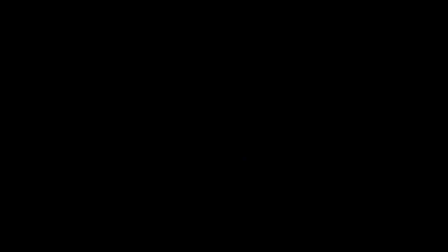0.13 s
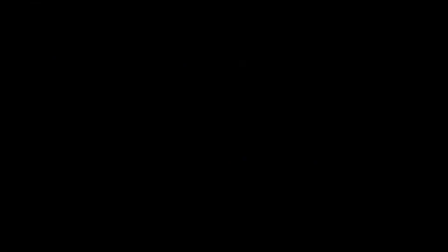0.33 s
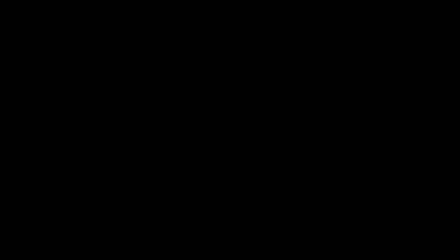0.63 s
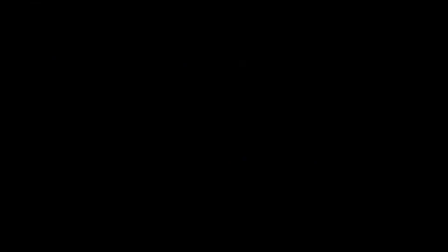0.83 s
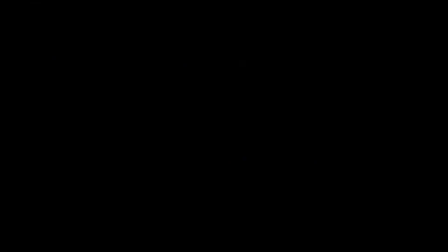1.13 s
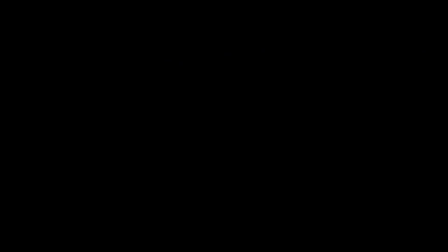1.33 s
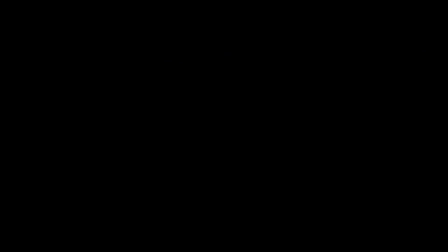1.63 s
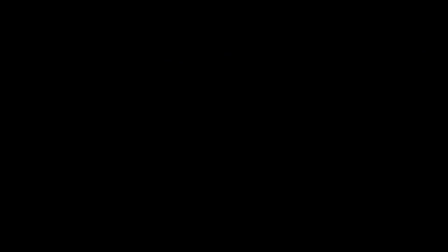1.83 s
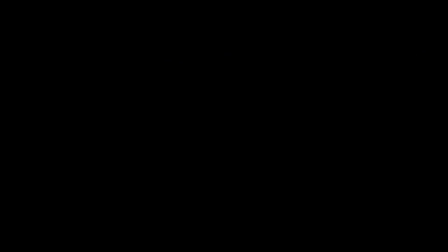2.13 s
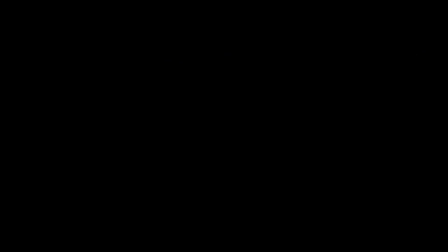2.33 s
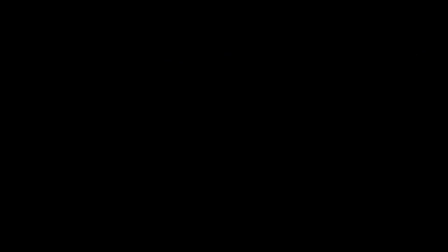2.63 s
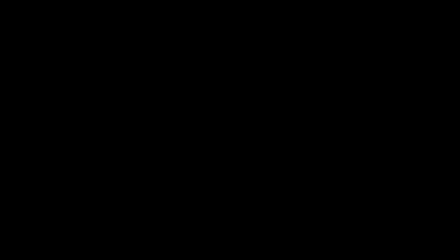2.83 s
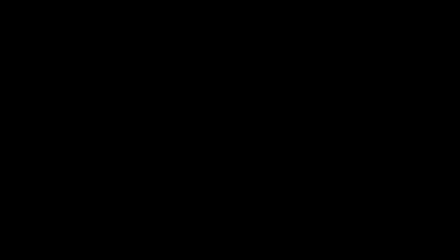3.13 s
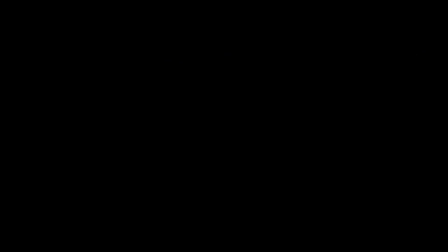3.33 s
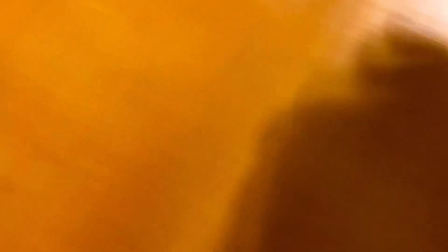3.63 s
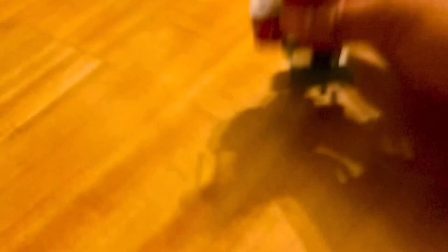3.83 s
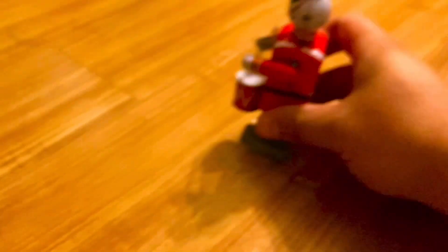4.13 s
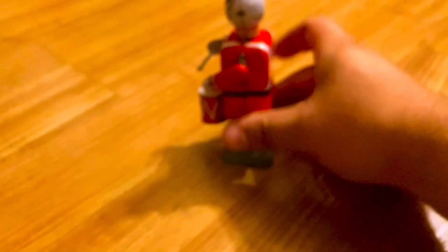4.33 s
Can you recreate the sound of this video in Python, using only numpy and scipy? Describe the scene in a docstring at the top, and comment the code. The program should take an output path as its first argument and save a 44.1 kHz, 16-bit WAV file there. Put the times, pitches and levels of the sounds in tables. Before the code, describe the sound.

Very close to a covered stereo microphone indoors, a tin clockwork toy is wound in short, uneven, muffled rasps with dry pawl clicks over faint mains hum. After about three seconds the camera is lifted with a deep double thump and knocks; then the gears whirr as a loud, bright, fluctuating hiss, with a small knock as the toy is set on a wooden floor.

```python
"""A tin clockwork toy is wound in short rasping strokes beside a camera whose microphones are covered.
The camera is lifted with a double thump; with the ports free the gears whirr as a loud bright hiss.
Rasp and whirr are dense random tooth contacts coloured by the tin; clicks are short noise plus tin tones;
thumps are brief low sines. A faint low tone swells once; mains hum, rumble and room tone lie underneath."""
import sys
import numpy as np
from scipy import signal
from scipy.fft import rfft, irfft, next_fast_len
from scipy.io import wavfile

SR = 44100
rng = np.random.default_rng(int(sys.argv[2]) if len(sys.argv) > 2 else 0)


def ratio(d):
    """dB to gain"""
    e = np.asarray(d, float) / 20
    return 10 ** e


def dump(signal):
    """Clip the signal to [-1, 1] and save it as 16-bit WAV at the path in sys.argv[1]."""
    limited = np.clip(np.atleast_2d(signal).T, -1, 1)
    pcm = np.round(limited * 32767).astype(np.int16)
    wavfile.write(sys.argv[1], SR, pcm)


N = 197347
SIZE = next_fast_len(N)
HZ = np.fft.rfftfreq(SIZE, 1 / SR)
TIME = np.arange(N) / SR


def in_time(rows):
    """Reads the columns of a curve table, sample by sample."""
    s, *columns = np.transpose(rows)
    return [np.interp(TIME, s, column) for column in columns]


def at_hz(points):
    """Reads a spectrum table at every frequency bin, on a log axis."""
    hz, value = np.transpose(points)
    return np.interp(np.log(HZ + 1), np.log(hz), value)


def rms_one(x):
    """Scales a sound to rms 1."""
    return x / np.sqrt(np.mean(x ** 2))


def drift(rate_hz):
    """Slow chance with spread 1, drawn at every 32nd sample."""
    r = np.exp(-64 * np.pi * rate_hz / SR)
    draws = rng.standard_normal(N // 32 + 1002)
    slow = signal.lfilter([1], [1, -2 * r, r * r], draws)[1000:]
    return np.interp(np.arange(N) / 32, np.arange(len(slow)), slow / np.std(slow))


def band(spectra, low_hz, high_hz):
    """Turns one band of a stereo spectrum back into sound."""
    skirt = 1 / np.sqrt((1 + (low_hz / (HZ + 1)) ** 16) * (1 + (HZ / high_hz) ** 16))
    return irfft(spectra * skirt, SIZE)[:, :N]


def ports(common, own, alike, lead):
    """Two microphone ports hear a shared wave, turned in phase, and a part of their own."""
    share = np.clip(at_hz(alike), 0, 1)
    hz, radians = np.transpose(lead)
    turn = np.exp(.5j * np.interp(HZ, hz, radians) * np.array([[1], [-1]]))
    return np.sqrt(share) * turn * rfft(common, SIZE) + np.sqrt(1 - share) * rfft(own, SIZE)


def swells(rows, idle_db=-120):
    """Level in dB of strokes that bite, swell to a peak, sag as slowly and die; powers add to an idle level."""
    swell_db_per_s, release_db_per_s = 86, 282
    onset_s, onset_from_db = 0.01, -24.5
    power = ratio(2 * idle_db)
    for s, length, peak_db, place in rows:
        end = s + length
        sag_db = -swell_db_per_s * np.abs(np.minimum(TIME, end) - s - place * length)
        bite_db = np.interp(TIME, [s - onset_s, s + onset_s], [onset_from_db, 0], left=-200)
        release_db = -release_db_per_s * np.maximum(TIME - end, 0)
        power = power + ratio(2 * (peak_db + sag_db + bite_db + release_db))
    return 10 * np.log10(power)


def clockwork(levels_db, bands, colour, hollows, alike, lead, per_s, spread_db, flutter_db, patchy_db, burst_db):
    """Dense tooth contacts of uneven size ring the tin; each frequency band follows its own level."""
    sizes = ratio(spread_db * np.minimum(rng.exponential(1, (3, N)), 5)) * rng.choice([-1, 1], (3, N))
    teeth = sizes * (rng.random((3, N)) < per_s / SR)
    body = 1 + sum(ratio(db) / (1 + (2 * (HZ - hz) / width) ** 2) for hz, width, db in hollows)
    # many close modes of the sheet make the colour ragged in steps of about 70 Hz
    ragged = ratio(2.6 * np.interp(HZ / 70, np.arange(400), rng.standard_normal(400)))
    spectra = ratio(at_hz(colour)) * body * ragged * ports(teeth[0], teeth[1:], alike, lead)
    # the train stumbles, and teeth come in bursts
    shared_db = flutter_db * np.tanh(drift(29)) + burst_db * np.tanh(drift(380))
    out = 0
    for level_db, low, high in zip(levels_db, bands, bands[1:]):
        edges = np.geomspace(low, high, 4)
        # the strips of a band drift by chance while their sum stays even
        parts = [band(spectra, *pair) for pair in zip(edges, edges[1:])]
        gains = [ratio(patchy_db * drift(13.2)) for part in parts]
        power = sum(gain ** 2 * np.mean(part ** 2) for gain, part in zip(gains, parts))
        strips = sum(gain * part for gain, part in zip(gains, parts)) / np.sqrt(power)
        out = out + ratio(level_db + shared_db) * rms_one(strips)
    return out


# Turns of the key. Each row: start in seconds, length in seconds, level of the teeth in dB,
# place of the peak along the stroke (0-1), tin body in dB against the teeth.
KEY_TURNS = [(-0.03, 0.12, -46, 0.53, -1), (0.11, 0.025, -48, 0.3, -2), (0.182, 0.012, -50.5, 0.3, -4.5),
             (0.345, 0.035, -68, 0.3, -2), (0.402, 0.09, -53.5, 0.7, -3), (0.491, 0.17, -47, 0.41, -5),
             (0.631, 0.15, -55.5, 0.88, 1.5), (0.921, 0.21, -42.5, 0.25, -2.5),
             (1.405, 0.23, -44.5, 0.75, -6.5), (1.668, 0.021, -56, 0.2, -2.5),
             (2.012, 0.012, -67, 0.4, 4.5), (2.154, 0.2, -51, 0.46, -0.5), (2.401, 0.035, -56, 0.5, 0.5),
             (2.48, 0.064, -60, 0.5, 0.5), (2.55, 0.012, -52, 0.3, 3), (2.694, 0.078, -68.5, 0.04, 10.5),
             (2.761, 0.015, -56.5, 0.5, 1), (2.922, 0.13, -59, 0.67, -1), (3.164, 0.11, -55, 0.06, -1)]
# Fingers rubbing on the tin, a narrower rasp. Each row: start in seconds, length in seconds,
# level of the rasp in dB, place of the peak (0-1).
FINGER_RUBS = [(1.93, 0.04, -79.5, 0.4), (2.54, 0.037, -50, 0.26), (2.80, 0.15, -58, 0.5),
               (3.068, 0.082, -50.5, 0.75)]
# Colour of the covered clockwork. Each row: frequency in Hz, relative level in dB.
COVERED_COLOUR = [(700, -15.5), (1250, -28), (1900, -20), (2600, -19.5), (3500, -6), (4500, -3.5),
                  (5800, -4), (7200, -9), (8200, -16.5), (9300, -31), (11000, -32), (15500, -33)]
# Hollows that sing in the rasp. Each row: frequency in Hz, width in Hz, strength in dB.
COVERED_SINGING = [(1930, 120, 12.5), (2500, 200, 0), (3600, 250, 4)]
# Sound common to both covered ports. Each row: frequency in Hz, share of the power (0-1).
COVERED_SHARE = [(700, 0.39), (2000, 0.54), (4000, 0.28), (7000, 0.2), (9000, 0.87)]
# Lead of the left covered port over the right. Each row: frequency in Hz, phase in radians.
COVERED_PHASE = [(0, 0), (1200, -3.0), (2000, 0), (4000, 2.0), (5500, 3.1), (8000, 3.6), (10000, 3.2),
                 (11300, 6.3), (13000, 9.4), (14700, 12.6), (16400, 15.7)]


def winding():
    """Turns and rubs drive three bands of the clockwork: tin body, rasp and teeth."""
    turn_rasp_db, rasp_with_tin = -12, 0.41  # rasp against teeth; share of the tin's lead it takes
    rub_tin_db, rub_teeth_db = -11, -2  # both against the rasp of a rub
    tin, rasp, teeth = [], list(FINGER_RUBS), []
    for s, length, db, place, tin_db in KEY_TURNS:
        tin.append((s, length, db + tin_db, place))
        rasp.append((s, length, db + turn_rasp_db + rasp_with_tin * tin_db, place))
        teeth.append((s, length, db, place))
    for s, length, db, place in FINGER_RUBS:
        tin.append((s, length, db + rub_tin_db, place))
        teeth.append((s, length, db + rub_teeth_db, place))
    # the wound spring creeps between turns, at the idle levels
    levels_db = [swells(tin, -87), swells(rasp, -94), swells(teeth, -87)]
    return clockwork(levels_db, [1000, 2600, 4500, 17000], COVERED_COLOUR, COVERED_SINGING,
                     COVERED_SHARE, COVERED_PHASE,
                     per_s=6000, spread_db=4.0, flutter_db=1.8, patchy_db=4.0, burst_db=-0.9)


# The gears running. Each row: time in seconds, hiss in dB, freedom of the tin in the hand (its ring in dB
# against the hiss), gear side turned to the ports (teeth in dB against the hiss).
GEAR_RUN = [(3.24, -69.5, 17, 9), (3.27, -60.5, 17.5, 8.5), (3.32, -57.5, 17.5, 11),
            (3.42, -59.5, 19.5, 17), (3.44, -45.5, 9, 12), (3.49, -40, 1.5, 11), (3.54, -35, 6.5, 6.5),
            (3.58, -24, -3.5, -4.5), (3.66, -22.5, -0.5, -5), (3.7, -23.5, 0.5, -5.5),
            (3.75, -21, -9.5, -8), (3.8, -24, -16.5, -10.5), (3.86, -22.5, -12.5, -16),
            (3.9, -25.5, -11.5, -9), (3.95, -27, -7, -12), (4.0, -26, -17, -18), (4.07, -28.5, -15.5, -12),
            (4.13, -32, -21, -8.5), (4.17, -26.5, -13, -10), (4.22, -20.5, -12.5, -9.5),
            (4.3, -26, -10, -8.5), (4.38, -24.5, -8, -5), (4.47, -24, -7, -8)]
# The toy is set on the floor. Each row: start in seconds, length in seconds, level in dB, place of the peak (0-1).
TOY_SET_DOWN = [(3.884, 0.066, -39, 0.26)]
# Colour with the ports free. Each row: frequency in Hz, relative level in dB.
FREE_COLOUR = [(400, -25), (700, -26.5), (1000, -18.5), (1600, -22), (2800, -11), (3600, -2.5),
               (4200, -5.5), (5000, -14.5), (6500, -8), (7700, -16), (8200, -7.5), (10000, -7.5),
               (12000, -7), (15500, -10)]
# Hollows that sing in the whirr. Each row: frequency in Hz, width in Hz, strength in dB.
FREE_SINGING = [(900, 250, 1), (1650, 230, 9), (3600, 300, 0), (4500, 300, 1)]
# Sound common to both free ports. Each row: frequency in Hz, share of the power (0-1).
FREE_SHARE = [(700, .65), (1500, .9), (2300, .7), (3000, .9), (4000, .6), (5000, .6), (6500, .8),
              (8500, .95)]
# Lead of the left free port over the right. Each row: frequency in Hz, phase in radians.
FREE_PHASE = [(0, 0), (900, -.7), (1400, -1.9), (1800, -2.5), (2400, -3.3), (4000, -3.3), (4700, -5.3),
              (6200, -4.0), (6500, -3.1), (8050, 0), (18250, 18.85)]


def gear_whirr():
    """The hiss escapes freely; grip and facing set tin body, rasp and teeth against it; the floor sounds along."""
    hiss_db, freedom_db, facing_db = in_time(GEAR_RUN)
    # the rasp is set low, a little lower towards the end
    rasp_trim_db, = in_time([(-1.33, 0), (9.27, -48)])
    # it follows only a part of grip and facing
    rasp_db = hiss_db + 8 + 0.63 * (freedom_db + facing_db) + rasp_trim_db
    scrape = [(s, length, db + 2, place) for s, length, db, place in TOY_SET_DOWN]
    levels_db = [swells(TOY_SET_DOWN, -53.5), hiss_db + freedom_db, swells(scrape, rasp_db),
                 hiss_db + facing_db, hiss_db]  # wood, tin, rasp, teeth, hiss
    return clockwork(levels_db, [400, 1200, 2600, 4500, 7800, 17000], FREE_COLOUR, FREE_SINGING,
                     FREE_SHARE, FREE_PHASE,
                     per_s=12000, spread_db=3.0, flutter_db=0.36, patchy_db=6.5, burst_db=1.0)


# Pawl clicks and knocks on the tin. Each row: time in seconds, level in dB, centre in Hz,
# tail in dB against the tick, time in seconds for the tail to fall 60 dB.
PAWL_CLICKS = [(0.121, -48, 1960, 0, 0.08), (0.187, -48.5, 3180, 3, 0.11), (0.354, -54, 1890, -12, 0.059),
               (0.413, -57, 1950, -24, 0.08), (0.479, -35.5, 5230, -2, 0.074),
               (0.503, -42.5, 2400, -10, 0.069), (0.532, -42, 6230, -3, 0.097),
               (0.631, -41.5, 5800, 0, 0.098), (0.775, -44.5, 3640, -6, 0.17),
               (0.931, -48, 1940, -15, 0.08), (1.508, -42.5, 2900, -8.5, 0.17),
               (1.678, -36.5, 5740, -8, 0.15), (1.989, -63.5, 5660, -27, 0.086),
               (2.022, -53, 4470, -4, 0.13), (2.163, -56, 6000, 0, 0.13), (2.42, -45.5, 2190, -2, 0.071),
               (2.469, -54, 3270, -3, 0.12), (2.501, -35.5, 3450, -14, 0.1), (2.559, -35, 5500, -1, 0.02),
               (2.566, -45, 3940, 5.5, 0.077), (2.698, -54, 1950, -9, 0.056),
               (2.769, -49.5, 1650, -3, 0.12), (2.929, -32, 4100, -9.5, 0.094),
               (3.052, -38.5, 4700, -8.5, 0.15), (3.173, -35.5, 1130, 3, 0.096),
               (3.263, -43, 1120, 0.5, 0.43), (3.432, -25, 4930, -9, 0.12),
               (3.668, -26.5, 4230, 5.5, 0.076), (3.675, -25, 4180, 3, 0.047)]
# Dull low knocks. Each row: the same columns as the clicks.
DULL_KNOCKS = [(0.929, -46, 1160, -4, 0.14), (3.289, -34.5, 373, -5.5, 0.46), (3.349, -35, 630, -3.5, 0.13),
               (3.387, -32, 574, -11, 0.6), (3.433, -31, 1150, -4, 0.07), (3.888, -21, 1010, -23, 0.72)]
# Ringing modes of the tin. Each row: frequency in Hz, relative level in dB, seconds to fall 60 dB.
TIN_MODES = [(1220, -5, 0.23), (1950, 0, 0.051), (2610, -10, 0.071), (3614, 0, 0.084), (4220, 5, 0.084),
             (5420, 20.5, 0.0059), (5980, 20, 0.019), (6810, 12, 0.022)]


def clicks():
    """Each click is a dry tick and a dying rattle round its own centre, plus the modes of the tin."""
    out = np.zeros((3, N))
    t = np.arange(SR // 5) / SR
    for s, peak_db, hz, tail_db, t60 in PAWL_CLICKS + DULL_KNOCKS:
        tick_and_tail = ratio(-60 * t / 0.0035) + ratio(tail_db - 60 * t / max(t60, .01))
        blow = rng.standard_normal((3, len(t))) * tick_and_tail
        w, r = 2 * np.pi * hz / SR, np.exp(-np.pi * .55 * hz / SR)
        b, a = (1 - r * r) / 2 * np.array([1, 0, -1]), [1, -2 * r * np.cos(w), r * r]
        once = signal.lfilter(b, a, blow)
        # twice through the resonance: steep flanks
        sound = 5.86 * (signal.lfilter(b, a, once) + .12 * once)
        for (mode_hz, mode_db, mode_t60), chance in zip(TIN_MODES, rng.standard_normal(len(TIN_MODES))):
            # a blow rings weaker the modes far from its own centre, 3 dB per octave
            off_centre_db = 3 * abs(np.log2(mode_hz / hz))
            ring_db = mode_db - 20.5 - off_centre_db + 7.9 * chance - 60 * t / mode_t60
            sound += ratio(ring_db) * np.sin(2 * np.pi * mode_hz * t)
        # a high-pass keeps each click free of lows
        sound = signal.sosfilt(signal.butter(2, 0.3 * hz, "high", fs=SR, output="sos"), sound)
        i = round(s * SR)
        out[:, i:i + len(t)] += ratio(peak_db) * sound[:, :N - i]
    # most of the top is held back
    dull = signal.sosfilt(signal.butter(6, 7800, fs=SR, output="sos"), out)
    out = dull + ratio(-14.5) * (out - dull)
    return irfft(ports(out[0], out[1:], COVERED_SHARE, COVERED_PHASE), SIZE)[:, :N]


# Thumps through the camera body. Each row: start in seconds, level in dB, pitch in Hz,
# rise in seconds, fall in seconds.
BODY_THUMPS = [(3.173, -37.5, 187, 0.0015, 0.013), (3.183, -24, 74.5, 0.0095, 0.026),
               (3.261, -41.5, 567, 0.0049, 0.014), (3.271, -9, 62.2, 0.021, 0.018),
               (3.285, -28, 223, 0.0045, 0.014), (3.29, -28, 151, 0.0042, 0.02),
               (3.3075, -18, 54.5, 0.0039, 0.056), (3.36, -39.5, 47, 0.025, 0.073),
               (3.58, -41, 62, 0.02, 0.022), (3.635, -38, 68, 0.026, 0.032)]


def thumps():
    """The camera body swings briefly as a sine, swelling and dying."""
    out = np.zeros((2, N))
    lead = np.array([[.15], [-.15]])  # radians: the shock reaches the left port first
    for s, peak_db, hz, rise, fall in BODY_THUMPS:
        t = TIME - s
        swell = np.sin(np.interp(t, [0, rise, rise + fall], [0, np.pi / 2, np.pi])) ** 2
        out += ratio(peak_db) * swell * np.sin(2 * np.pi * hz * t + lead)
    return out


# A faint low tone as the whirr starts. Each row: start in seconds, length in seconds, level in dB,
# place of the peak (0-1).
LOW_TONE_SWELL = [(3.56, 0.064, -52, 0.38)]


def low_tone():
    """A sine near 225 Hz that wavers a little in pitch, swelling once."""
    pitch_hz = 225 + 3.0 * drift(15)
    return ratio(swells(LOW_TONE_SWELL)) * np.sqrt(2) * np.sin(2 * np.pi * np.cumsum(pitch_hz) / SR)


# Level of the low room tone and rumble over time. Each row: time in seconds, level in dB that tone and hum
# both follow, rumble in dB.
ROOM_LEVELS = [(0, -59, -72.5), (0.6, -54.5, -70), (1.4, -58, -57.5), (3.1, -54.5, -80), (3.45, -47, -62),
               (3.67, -53.5, -62), (3.95, -64, -66), (4.47, -56, -81)]
# Colour of the room. Each row: frequency in Hz, relative level in dB.
ROOM_SPECTRUM = [(15, -64), (25, -53), (43, -6.5), (90, -6.5), (124, -11), (193, -18.5), (266, -21),
                 (366, -20), (480, -28), (517, -25.5), (614, -23), (2500, -60.5), (9000, -75), (11700, -99),
                 (19800, -120)]
# Room sound common to both ports. Each row: frequency in Hz, share of the power (0-1).
ROOM_SHARE = [(60, 0.95), (130, 0.74), (290, 0.74), (700, 0), (3000, 0)]
# Mains hum. Each row: frequency in Hz, level in dB against the level that tone and hum follow.
MAINS_HUM = [(60, -8), (120, -4)]


def room():
    """Coloured noise gives rumble and room tone; slightly wavering sines give the mains hum."""
    tone_db, rumble_db = in_time(ROOM_LEVELS)
    white = rng.standard_normal((3, N))
    spectra = ratio(at_hz(ROOM_SPECTRUM)) * ports(white[0], white[1:], ROOM_SHARE, [(0, 0), (SR, 0)])
    hum = sum(ratio(db + 2.43 * drift(11)) * np.sqrt(2) * np.sin(2 * np.pi * hz * TIME) for hz, db in MAINS_HUM)
    rumble = ratio(rumble_db + 5.5 * drift(3.9)) * rms_one(band(spectra, 25, 94))
    tone = ratio(-5.0) * rms_one(band(spectra, 98.4, 12000))
    return rumble + ratio(tone_db) * (tone + hum)


def scene():
    """Winding gives way to the free whirr as the camera is lifted."""
    free, = in_time([(0, 0), (3.24, 0), (3.27, 1), (5, 1)])
    toy = np.sqrt(1 - free) * winding() + np.sqrt(free) * gear_whirr()
    return toy + clicks() + thumps() + low_tone() + room()


def low_pass(x):
    """Removes everything above the highest recorded frequency."""
    return signal.sosfilt(signal.butter(12, 16650, fs=SR, output="sos"), x)


def record(dry):
    """A steep low-pass takes away the sound above 15.8 kHz."""
    mix = signal.sosfilt(signal.ellip(10, .5, 70, 15800, fs=SR, output="sos"), dry)
    return low_pass(mix)


dry = scene()
out = record(dry)
dump(out)
```